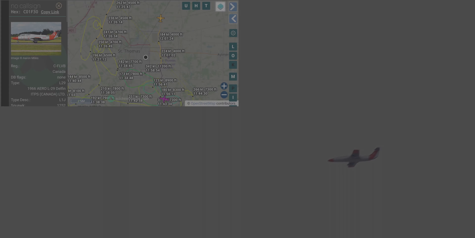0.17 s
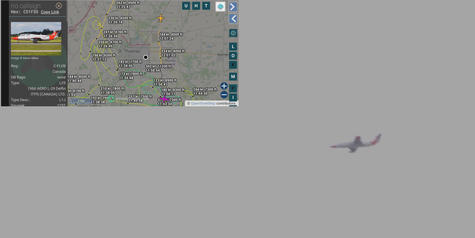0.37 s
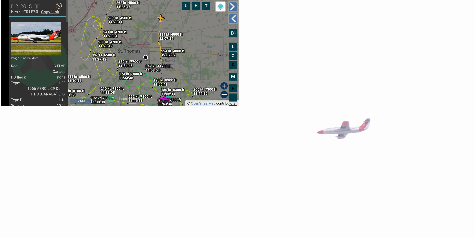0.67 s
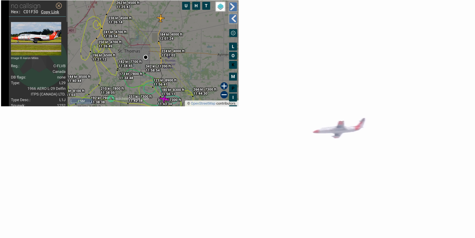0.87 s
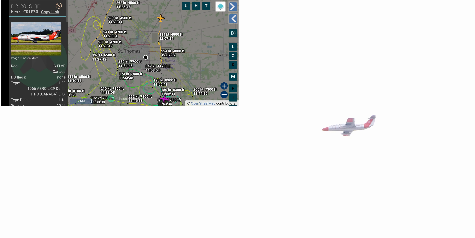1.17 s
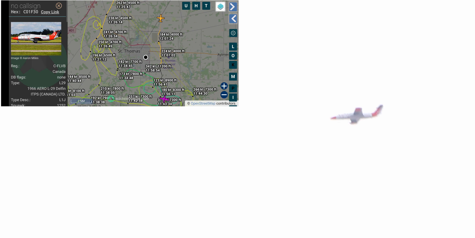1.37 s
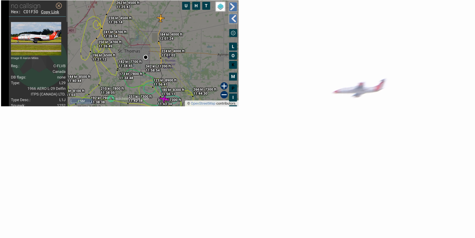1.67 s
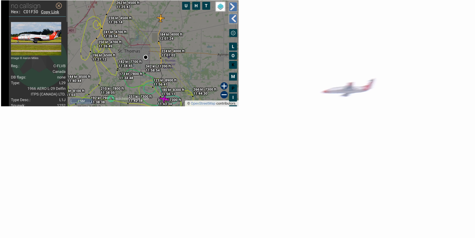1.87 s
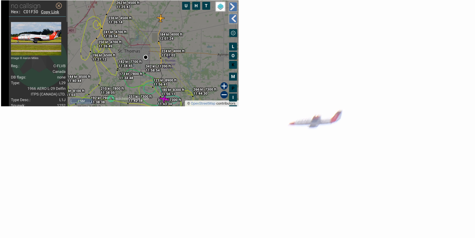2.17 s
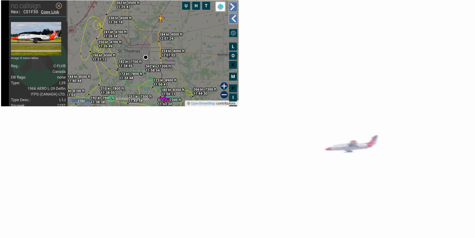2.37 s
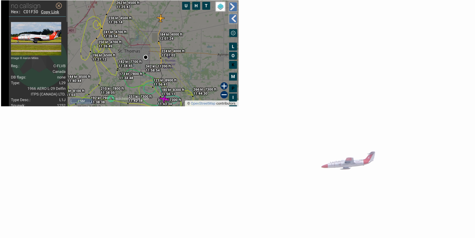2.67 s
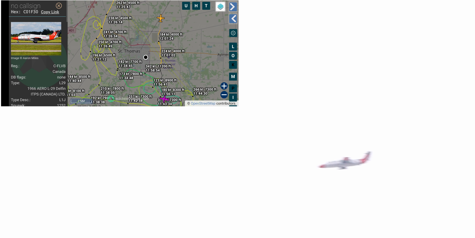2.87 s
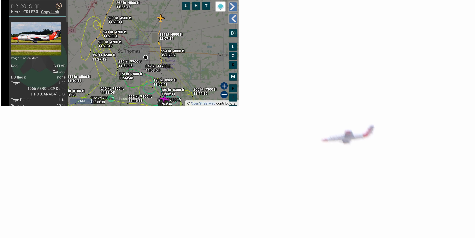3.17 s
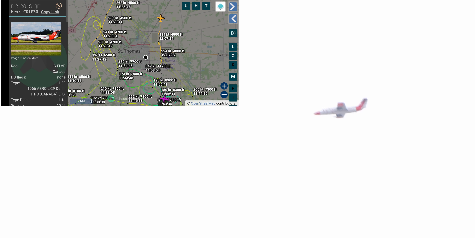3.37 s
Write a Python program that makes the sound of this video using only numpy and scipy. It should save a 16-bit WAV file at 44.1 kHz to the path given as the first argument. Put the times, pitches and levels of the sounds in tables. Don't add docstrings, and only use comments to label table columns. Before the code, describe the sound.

Low throbbing drone of a far-off propeller plane, with soft hiss and small hand-held camera ticks.

```python
import sys
import numpy as np
from scipy import signal
from scipy.io import wavfile

SR = 44100
rng = np.random.default_rng(int(sys.argv[2]) if len(sys.argv) > 2 else 0)


def generate_wav(sig):
    pcm = np.round(np.clip(np.atleast_2d(sig).T, -1, 1) * 32767).astype(np.int16)
    wavfile.write(sys.argv[1], SR, pcm)


def invert_db(x):
    u = np.asarray(x, float) / 20
    return 10 ** u


N = 155232

# (time [s], blade rate [Hz], level [dB rms])
BLADES = [
    (0, 82.23, -18.5),
    (0.597, 81.6, -19),
    (1.196, 80.96, -18.5),
    (1.601, 80.78, -18),
    (2.251, 80.42, -17),
    (2.55, 79.44, -18),
    (2.802, 79.9, -22),
    (3.0, 79.25, -19),
    (3.202, 79.1, -20.5),
    (3.52, 79.2, -21),
]
# (multiple [1], level under the tone [dB], phase [rad], flutter [dB])
OVERTONES = [
    (2, -12.5, -1.6, 1.3),
    (3, -12, -2.0, .7),
    (3.27, -17, 0.1, .7),
    (4, -23, -2.3, 2.0),
    (5, -21, -0.4, 1.0),
    (8, -30, 0.1, 3.0),
]
# (time [s], third [dB], shaft line [dB], fifth [dB])
ECHO_LIFT = [
    (0, 3, 3.5, 0.8),
    (.85, -1, 6, 4.5),
    (1.1, -1, -6, -1),
    (1.4, -3, -4, -3),
    (1.6, 2.5, 4.5, -7),
    (2.1, -2.5, -3.5, -2.5),
    (2.9, 0.7, -5.5, -3),
    (3.52, 5, -5, -2),
]
# (frequency [Hz], level [dB per Hz])
ROAR = [(75, -17.5), (116, -4.5), (142, 0.5), (243, -4.5), (397, -7.5), (511, -16), (710, -15.5),
        (1950, -44), (4500, -69.5), (9900, -110)]
# (frequency [Hz], likeness [0-1])
LIKENESS = [(100, 1), (300, 0.97), (640, 1), (1400, 0.99), (3000, .1)]
# (frequency [Hz], width [Hz], gain [1])
HUMPS = [(176, 48, 0.26), (380, 68, 0.68), (690, 375, 0.73), (1020, 150, 1.24), (1440, 180, 0.43)]
# (time of top [s], centre [Hz], level [dB rms], half length [s])
SWELLS = [(0.311, 690, -29.5, 0.16), (0.33, 1020, -37.5, 0.15), (0.86, 385, -27, 0.075),
          (0.959, 189, -25, 0.088), (0.965, 311, -25.5, 0.061), (1.1, 210, -35.5, 0.33),
          (1.15, 457, -36, 0.15), (2.9, 519, -31, 0.17), (3.223, 256.1, -27, 0.13),
          (0.493, 332, -30.5, 0.11), (1.219, 907, -37.5, 0.1), (1.3, 163.6, -27, 0.23),
          (1.498, 675.7, -31, 0.064), (1.536, 428, -29.5, 0.12), (1.55, 170, -23, 0.094),
          (1.566, 976, -38, 0.059), (1.77, 170.5, -23.5, 0.07), (1.867, 690, -34.5, 0.15),
          (2.2, 169.4, -39, 0.1), (2.411, 652.3, -28.5, 0.11), (2.467, 1060, -40, 0.051),
          (2.473, 416, -32.5, 0.058), (2.66, 155, -28.5, 0.2), (2.851, 690, -29, 0.094),
          (2.885, 194, -28.5, 0.071), (3.25, 700, -37.5, 0.19), (3.404, 381.6, -22, 0.2),
          (3.352, 190.5, -27.5, 0.19), (0.095, 1090, -38, 0.12), (0.097, 574, -36, 0.069),
          (1.27, 153, -36, 0.043), (1.306, 940, -43, 0.032), (2.11, 167, -26.5, 0.053),
          (2.537, 700, -41, .06), (2.53, 1080, -47, 0.023), (2.735, 1060, -43, 0.065),
          (3.14, 144, -25, 0.061), (3.363, 558, -36, 0.14), (3.2, 1295, -49.5, 0.17),
          (1.581, 243, -25, 0.059), (3.4, 148, -25.5, .1), (.42, 560, -35, 0.081),
          (1.95, 145.5, -28.5, .08), (.85, 437, -32, 0.054)]
# (time of top [s], level above steady wind [dB], half length [s])
GUSTS = [
    (1.51, 5, .2),
    (2.644, 6, 0.047),
    (2.793, 7.5, 0.047),
    (3.009, 2, .04),
    (3.137, 6, .05),
    (3.5, 12, .05),
]
# (frequency [Hz], level [dB per Hz])
HISS = [(710, -36), (1200, 1), (1360, -1), (2030, -12.5), (4290, -17.5), (6800, -19), (15000, -20.5),
        (15500, -23)]
# (time [s], level [dB])
GAIN_CREEP = [
    (0, 3.5),
    (.5, 1),
    (.9, 0.3),
    (1.6, 0.1),
    (2.3, -0.5),
    (2.85, 2.1),
    (3.52, -2),
]
# (frequency [Hz], level [dB rms])
WHINES = [(5060, -83.5), (6503, -87.5), (7246, -87.5), (8199, -86.5), (11256, -90.5)]
# (time [s], peak level [dB], pitch [Hz], t60 [s])
TICKS = [(.112, -41, 3300, 0.068), (.317, -48, 3500, 0.11), (.6, -40, 1920, 0.12), (.777, -47, 2850, .06),
         (.935, -53, 3520, 0.074), (.967, -47, 3500, 0.15), (1.036, -45, 3520, 0.088),
         (1.085, -44, 2230, .04), (1.12, -49, 4400, 0.044), (1.162, -52, 2920, 0.036),
         (1.21, -48, 2110, .05), (1.22, -46, 3200, 0.18), (1.235, -47, 3570, 0.25), (1.25, -52, 3200, .15),
         (1.301, -49, 3600, 0.15), (1.484, -44, 3830, 0.06), (1.645, -47.5, 3300, 0.12),
         (2.015, -52, 3600, .08), (2.203, -50, 3693, 0.054), (2.319, -57, 2380, 0.084),
         (2.363, -56, 3460, 0.18), (2.457, -45, 3160, .1), (2.527, -48, 2080, 0.068),
         (2.574, -46.5, 3900, 0.025), (2.586, -52, 2250, .03), (2.723, -52, 3700, 0.11),
         (2.967, -54, 3700, .04), (3.011, -49, 4050, 0.075), (3.028, -53, 3450, .06),
         (3.059, -50, 4070, .08), (3.216, -49.5, 4065, 0.14)]
# (time [s], peak level [dB], pitch [Hz], t60 [s])
KNOCKS = [(.113, -36, 1420, .1), (.829, -33, 1430, 0.16), (.99, -42, 1750, 0.07), (1.104, -32, 1450, .2),
          (1.13, -39, 1520, .1), (1.02, -42, 1480, .08), (1.302, -38, 1670, 0.05), (1.748, -35, 1650, 0.11),
          (1.91, -40.5, 1680, .06), (3.02, -36, 1400, .06), (3.305, -44, 1400, .08)]
# (time [s], peak level [dB], brightness [Hz], t60 [s])
SNAPS = [(.6398, -33, 7500, 0.03), (.6398, -38, 11200, 0.022), (.6402, -46, 14000, .02),
         (.6448, -35, 7700, 0.045), (.646, -37, 5300, 0.06), (.6455, -44, 11000, .04),
         (.6465, -47, 14500, .02), (.6575, -42, 5000, .05), (.659, -45, 8000, .05),
         (1.7436, -42, 7700, 0.03), (1.7436, -47, 11600, .03), (1.7436, -42, 4800, .035),
         (1.7475, -39, 3700, 0.06), (1.7505, -44, 7200, .025), (.27, -50, 8100, 0.034),
         (.39, -53, 7500, 0.074), (1.484, -55, 11000, 0.027), (2.458, -49, 6600, 0.04),
         (2.462, -52, 5800, .03), (2.589, -52, 8300, .03), (2.586, -55, 11500, .03), (3.13, -52, 8950, .03)]
# (time [s], peak level [dB], centre [Hz],
# t60 [s])
BROAD_KNOCKS = [(.641, -32, 1600, 0.55), (.643, -40, 3500, .3), (.645, -39.5, 4600, 0.27),
                (1.12, -38, 1690, 0.17), (1.215, -49, 3400, .3), (1.484, -51, 4500, .06),
                (1.742, -33, 1640, 0.22), (1.745, -44, 4000, .2), (1.746, -58, 6000, 0.1),
                (2.013, -36, 1630, 0.16), (2.015, -52, 3500, .1), (2.362, -37, 1600, 0.11),
                (2.722, -39, 1770, 0.096), (3.007, -34.5, 1550, 0.28), (3.009, -51, 3500, 0.097)]

ROAR_PAN_DB, ROAR_LAG_S = -0.34, 0.00007


def rms_one(x):
    return x / np.sqrt(np.mean(x ** 2) + 1e-20)


def at_hz(points, hz):
    table_hz, value = np.array(points).T
    return np.interp(np.log(hz), np.log(table_hz), value)


def drift(rate):
    r = np.exp(-80 * np.pi * rate / SR)
    steps = rng.standard_normal(N // 40 + 2002)
    slow = signal.lfilter([1], [1, -2 * r, r * r], steps)[2000:]
    return np.interp(np.arange(N) / 40, np.arange(len(slow)), rms_one(slow - slow.mean()))


def resonance(x, hz, width_hz):
    r = np.exp(-np.pi * width_hz / SR)
    poles = [1, -2 * r * np.cos(2 * np.pi * hz / SR), r * r]
    return signal.lfilter([(1 - r * r) / 2, 0, (r * r - 1) / 2], poles, x)


def left_right(mid, side, alike):
    alike = np.clip(alike, 0, 1)
    return np.sqrt(1 + alike) * mid + np.sqrt(1 - alike) * side * [[1], [-1]]


def pair(alike, length):
    mid, side = rng.standard_normal((2, length))
    return left_right(mid, side, alike) / np.sqrt(2)


def placed(x, pan_db, lag_s):
    n = np.arange(N)
    left = np.interp(n - lag_s * SR, n, x[0])
    return np.array([left * invert_db(pan_db / 2), x[1] * invert_db(-pan_db / 2)])


def banded(spectrum, likeness, own_db, shared_db):
    out, together = 0, drift(3.1)
    lowest, highest = spectrum[0][0], spectrum[-1][0]
    edges = lowest * 2 ** np.arange(0, np.log2(highest / lowest), 1 / 3)
    white = rng.standard_normal((2, 2, N))
    for k, (low, high) in enumerate(zip(edges, edges[1:])):
        sos = signal.butter(2, [low, high], "band", fs=SR, output="sos")
        mid, side = signal.sosfilt(sos, white[k % 2])
        hz = np.sqrt(low * high)
        gain = invert_db(at_hz(spectrum, hz) + shared_db * together + own_db * drift(1.86))
        out = out + gain * left_right(mid, side, at_hz(likeness, hz))
    return rms_one(out)


def propellers():
    time, blade_hz, blade_db = np.transpose(BLADES)
    t = np.arange(N) / SR
    turn = 2 * np.pi * np.cumsum(np.interp(t, time, blade_hz)) / SR
    tone_db = np.interp(t, time, blade_db) + 0.62 * drift(5.4)
    tone = np.sqrt(2) * invert_db(tone_db) * np.cos(turn)

    echo_time, *lifts = np.transpose(ECHO_LIFT)
    lift_db = {m: np.interp(t, echo_time, v) for m, v in zip((3, 3.27, 5), lifts)}
    upper = np.zeros(N)
    for multiple, under_db, phase, flutter_db in OVERTONES:
        level_db = -18.5 + under_db + lift_db.get(multiple, 0) + flutter_db * drift(1.8)
        wander = multiple * 0.25 * drift(0.99)
        upper += np.sqrt(2) * invert_db(level_db) * np.cos(multiple * turn + phase + wander)
    return placed([tone, tone], 1.8, 0.00023) + placed([upper, upper], ROAR_PAN_DB, ROAR_LAG_S)


def roar():
    base = banded(ROAR, LIKENESS, own_db=2, shared_db=0.5)
    echoed = base + sum(gain * resonance(base, hz, width_hz) for hz, width_hz, gain in HUMPS)

    swells = np.zeros((2, N + SR))
    t = np.arange(SR) / SR - 0.5
    for time, hz, db, half_s in SWELLS:
        width_hz = 0.23 * hz
        noise = pair(at_hz(LIKENESS, hz), SR)
        band = rms_one(resonance(resonance(noise, hz, width_hz), hz, width_hz))
        start = int(time * SR)
        swells[:, start:start + SR] += invert_db(db) * np.exp(-(t / half_s) ** 2) * band
    swells = swells[:, SR // 2:SR // 2 + N]
    return placed(swells + invert_db(-27.5) * rms_one(echoed), ROAR_PAN_DB, ROAR_LAG_S)


def wind():
    top = signal.butter(6, 64, fs=SR, output="sos")
    bottom = signal.butter(2, 38, "high", fs=SR, output="sos")
    rumble = signal.sosfilt(np.vstack([top, bottom]), pair(0.8, N + SR))[:, SR:]
    t = np.arange(N) / SR
    gust_db = sum(db * np.exp(-((t - time) / half_s) ** 2) for time, db, half_s in GUSTS)
    return invert_db(-33.5 + gust_db + 2.3 * drift(3.8)) * rms_one(rumble)


def hiss():
    t = np.arange(N) / SR
    whines = sum(np.sqrt(2) * invert_db(db) * np.sin(2 * np.pi * hz * t + 2.0 * drift(7.1)) for hz, db in WHINES)
    spectrum = HISS[:-1] + [(21500, HISS[-2][1])]
    noise = banded(spectrum, [(100, 0), (200, 0)], own_db=0.25, shared_db=0.25)
    return invert_db(-53.5 + np.interp(t, *np.transpose(GAIN_CREEP))) * noise + whines


def creaks():
    slips_per_s = 400 * invert_db(5 * drift(6.0))
    slips = (rng.random((2, N)) < slips_per_s / SR) * rng.standard_normal((2, N))
    ringing = resonance(resonance(slips + 1e-18, 3500, 1300), 3500, 1300)
    return invert_db(-68.5) * rms_one(ringing)


def contacts(events, width, spill_db, rise_s, blow):
    out, t = np.zeros((2, N + SR)), np.arange(SR // 4) / SR
    for time, db, hz, t60 in events:
        burst = pair(0, len(t)) * invert_db(-60 * t / t60) * np.minimum(t / rise_s, 1)
        grain_db = 3 * np.interp(t / 0.002, np.arange(200), rng.standard_normal(200))
        burst = burst * invert_db(grain_db)
        burst[[0, 1], [int(rise_s * SR), int(rise_s * SR + SR / hz / 4)]] += blow
        ring = resonance(resonance(burst, hz, width * hz), hz, 2 * width * hz)
        sound = ring + invert_db(spill_db) * resonance(burst, hz, 0.64 * hz)
        start = int(time * SR)
        out[:, start:start + len(t)] += invert_db(db) * sound / np.abs(sound).max()
    return out[:, :N]


def ticks():
    return contacts(TICKS, width=0.08, spill_db=-29.5, rise_s=0.001156, blow=14)


def knocks():
    return contacts(KNOCKS, width=0.07, spill_db=-59.5, rise_s=0.0021, blow=35)


def snaps():
    return contacts(SNAPS, width=0.15, spill_db=-21, rise_s=0.00024, blow=4)


def broad_knocks():
    return contacts(BROAD_KNOCKS, width=0.5, spill_db=-44, rise_s=0.0025, blow=0)


def scene():
    sky = propellers() + roar() + wind()
    camera = hiss() + creaks() + ticks() + knocks() + snaps() + broad_knocks()
    return sky + camera


def band_limit(x):
    return signal.sosfilt(signal.butter(12, 16410, fs=SR, output="sos"), x)


def record(dry):
    fade = np.clip((np.arange(N) / SR - 0.04) / (0.41 - 0.04), 0, 1)
    top_cut = signal.ellip(12, 0.3, 70, 15760, fs=SR, output="sos")
    return band_limit(signal.sosfilt(top_cut, dry * fade))


dry = scene()
out = record(dry)
generate_wav(out)
```